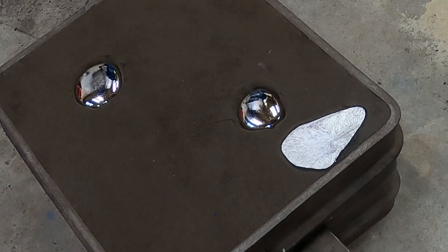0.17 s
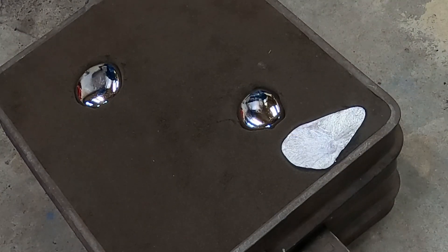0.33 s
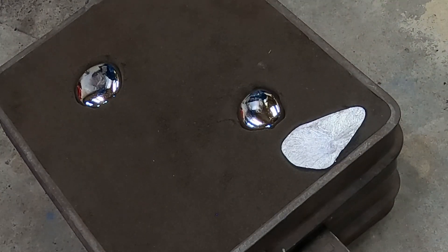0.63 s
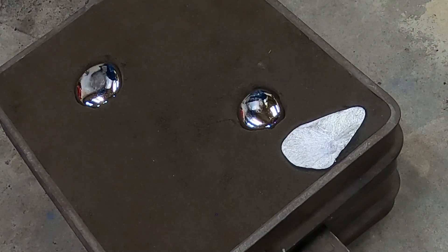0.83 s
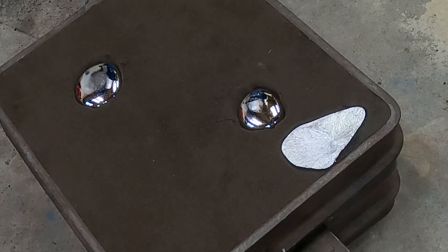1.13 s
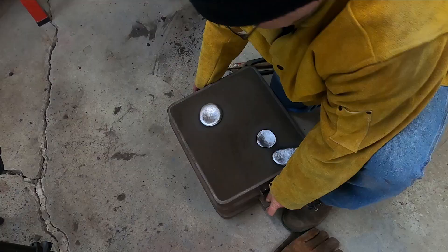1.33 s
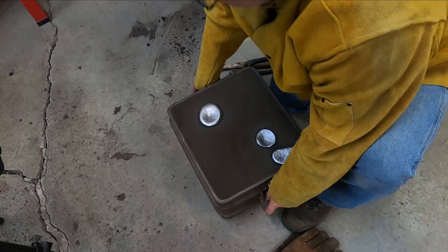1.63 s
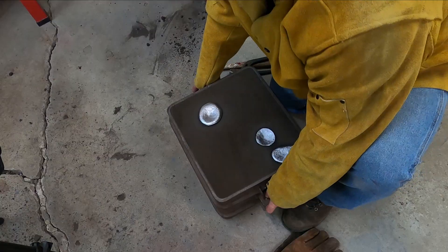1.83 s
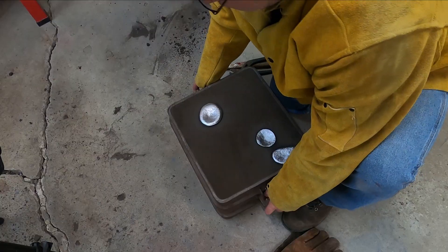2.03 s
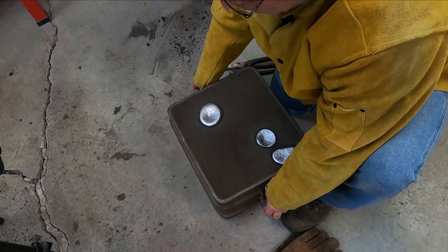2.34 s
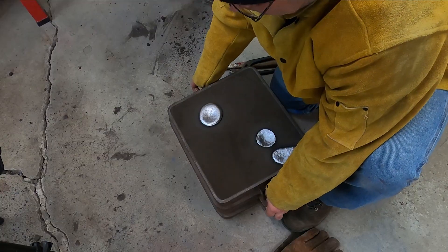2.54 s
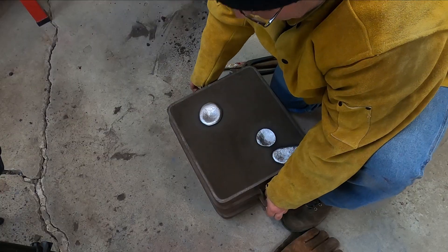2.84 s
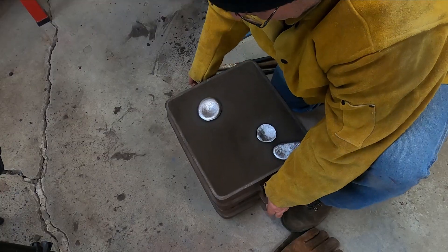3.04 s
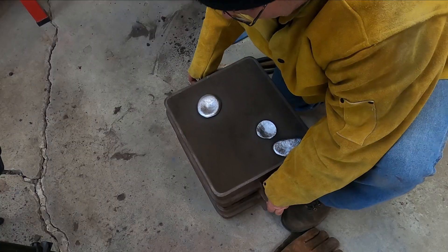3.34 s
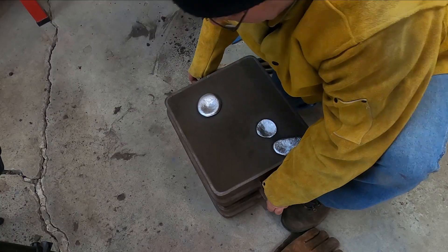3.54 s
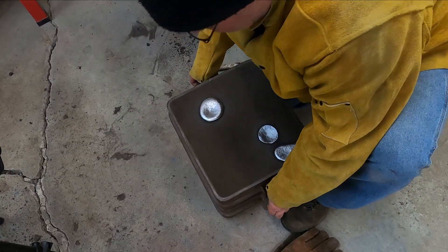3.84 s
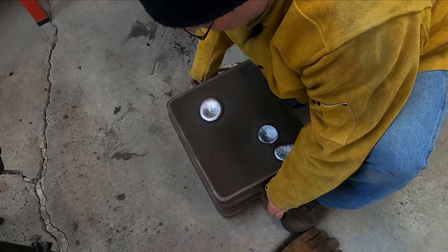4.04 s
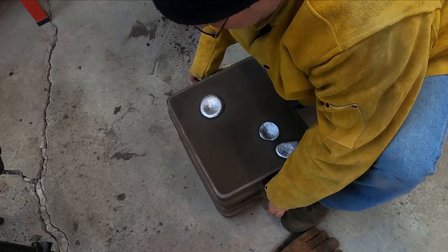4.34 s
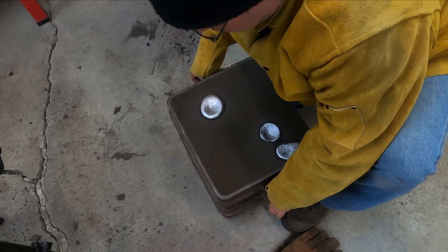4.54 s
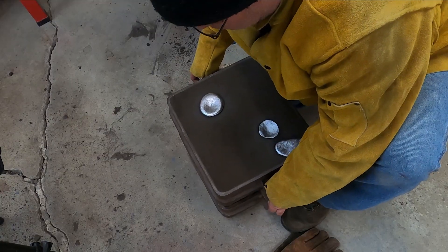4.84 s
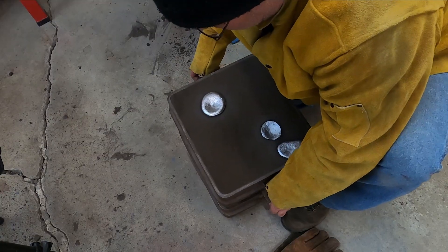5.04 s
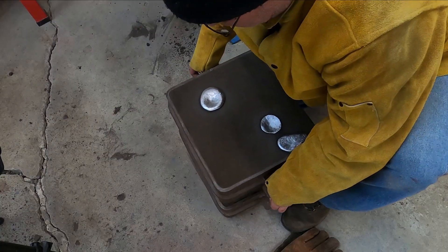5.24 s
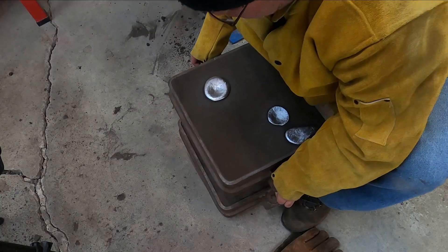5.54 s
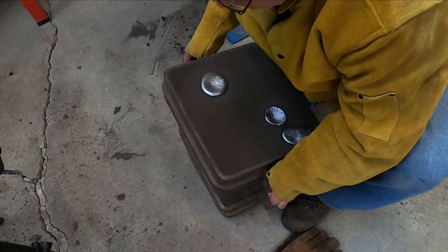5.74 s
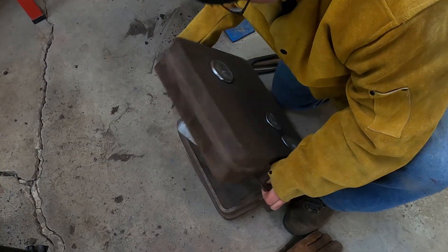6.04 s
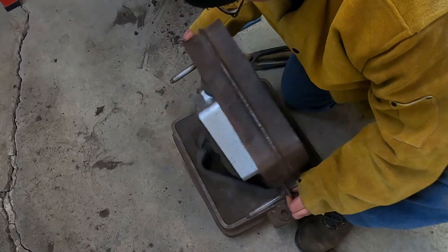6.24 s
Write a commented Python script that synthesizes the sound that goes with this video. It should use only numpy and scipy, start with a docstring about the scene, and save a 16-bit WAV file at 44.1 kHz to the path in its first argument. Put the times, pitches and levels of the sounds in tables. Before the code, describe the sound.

A quiet workshop with faint steady air and low rumble, heard close, with a short boomy room. From 0 to 0.7 s a canvas sleeve rustles softly, with sand grit, tiny ticks and a light hollow metallic touch; a sharp click and thin metal rasp come at about 0.76 s. Grit scrapes at 1.4 s, then a loud, heavy iron clunk lands at 1.47 s, deep and clattering. Softer knocks follow near 1.9 to 2.0 s, then near quiet. A firm double thud at 3.2 s begins irregular dull bumps at 3.6 to 3.9 and 4.35 s, with short sand crunches. From 4.6 to 5.1 s the knocks cluster with clicks and small rasps, the last one harder and clackier. Faint bumps at 5.35 s, then a lull with slight rustling. At 6.3 s the top half slams against the lower: the sharpest bang, bright edge, deep boom and brief rim ring.

```python
"""In a workshop, a heavy iron casting flask full of sand is rocked and pulled apart on the concrete floor.
Over steady air and a low rumble (shaped noise), a canvas sleeve rustles and loose grains tick.
Sand crunches and metal rasps (grainy noise); iron thuds and clacks (ringing modes and cracks of noise).
At last the top half is tipped over and bangs against the lower one, and its rim rings."""
import sys
import numpy as np
from scipy import signal
from scipy.fft import rfft, irfft, next_fast_len
from scipy.io import wavfile

SR = 44100
rng = np.random.default_rng(int(sys.argv[2]) if len(sys.argv) > 2 else 0)


def dump(signal):
    """Clip the signal to [-1, 1] and save it as 16-bit WAV at the path in sys.argv[1]."""
    limited = np.clip(np.atleast_2d(signal).T, -1, 1)
    pcm = np.round(limited * 32767).astype(np.int16)
    wavfile.write(sys.argv[1], SR, pcm)


N = 281799   # length of the scene in samples

# Levels in the spectra and mode tables are relative: they set the balance within one sound.
# workshop air: (frequency [Hz], level per Hz [dB])
AIR_SPECTRUM = [(28, -10.5), (45, -11), (72, -14), (100, -7.5), (180, -4.5), (300, -20.5), (700, -24.5),
                (1250, -19), (1700, -23), (2400, -32), (4500, -36.5), (6800, -35), (10000, -50),
                (14000, -65)]
AIR_DB = -66
# low rumble, faint at rest and stronger with the arm movements: (frequency [Hz], level per Hz [dB])
RUMBLE_SPECTRUM = [(25, -19.5), (50, -10), (75, 9), (105, -13.5), (170, -5), (300, -16), (700, -28.5),
                   (3000, -59.5)]
RUMBLE_REST_DB, RUMBLE_OVER_MOVEMENT_DB = -64.5, 0
# how alike left and right are: (frequency [Hz], likeness [0 to 1])
EAR_LIKENESS = [(48, .995), (80, .85), (145, .993), (330, .97), (600, .83), (1500, .74), (3000, .72),
                (8000, .6)]
ROOM_T60_S = 0.45   # time the room takes to fade by 60 dB
LEFT_LAG_S = 3.6e-5   # the left ear hears the near sounds this much later

# arm movements: (middle [s], length [s], level [dB])
ARM_MOVEMENTS = [(0.017, 0.18, -58.5), (0.26, 0.15, -63), (0.595, 0.22, -58.5), (3.785, 0.38, -66.5),
                 (4.0, .1, -69), (4.88, .3, -63), (5.536, 0.32, -65.5), (6.036, 0.075, -74),
                 (6.286, 0.18, -64.5)]
# rubbing canvas: (frequency [Hz], level per Hz [dB])
CANVAS_SPECTRUM = [(150, -5.5), (400, -4), (700, -10), (1400, -1.5), (2600, -4.5), (4300, -5), (6200, -7),
                   (8500, -15.5), (13000, -22)]
SLEEVE_TILT_DB = 6   # the dull part is raised and the bright part lowered by this much

# sand and grit: (frequency [Hz], level per Hz [dB])
GRIT_SPECTRUM = [(150, -4), (400, -4), (1500, -2.5), (2500, -6), (4200, -6.5), (5200, -9.5), (8500, -12.5),
                 (10500, -26), (14000, -31.5)]
# loose grains: rate, level setting against the movement, middle pitch
GRAINS_PER_S, GRAIN_DB, GRAIN_HZ = 4, -5, 4000
# sharp contacts of grit and of metal edges: (time [s], level [dB], pitch [Hz])
SHARP_CONTACTS = [(0.429, -49.5, 1590), (0.483, -47.5, 2140), (0.6355, -44.5, 900), (0.7568, -34.5, 3130),
                  (1.246, -54, 4590), (1.405, -47.5, 3520), (1.435, -46, 3500), (3.224, -46.5, 3300),
                  (4.598, -55, 4500), (4.749, -42.5, 2700), (4.9133, -41.5, 3130), (4.9988, -49, 5300),
                  (5.453, -56, 2300), (6.321, -14, 910), (6.3225, -45, 7500), (6.3233, -13.5, 2800)]
# sand and grit crushed under the iron: (start [s], length [s], level [dB], brightness [dB per octave])
SAND_CRUNCHES = [(0.0, 0.031, -49.5, -1.5), (0.757, 0.029, -45, -0.5), (0.804, 0.05, -48, -1.5),
                 (1.228, 0.043, -62.5, 5), (1.391, 0.15, -48.5, -3), (1.847, 0.037, -46, -2),
                 (1.973, 0.089, -59, 0), (3.222, 0.093, -52.5, -3.5), (3.665, 0.034, -58.5, -2),
                 (3.931, 0.034, -54.5, -2.5), (4.341, 0.084, -54, -3.5)]
# metal rasping on metal: (start [s], length [s], level [dB], brightness [dB per octave])
METAL_RASPS = [(0.760, 0.046, -46.5, 8), (4.747, .019, -60, 22), (4.83, 0.095, -59.5, -5),
               (4.914, .07, -55, -5)]
# colour of the rasping: (frequency [Hz], level per Hz [dB])
RASP_SPECTRUM = [(500, -9), (2000, -15), (2900, 7.5), (3600, 4.5), (4400, 1), (5100, -18), (7500, -41),
                 (8500, -13.5), (10000, -34), (14000, -38)]

# touches that make a light hollow ring: (time [s], level [dB])
HOLLOW_TOUCH_TIMES = [(0.635, -60), (0.653, -51.5), (0.676, -43.5), (0.838, -49)]
# tones of the hollow ring: (frequency [Hz], level [dB])
HOLLOW_TONES = [(392, 5), (662, -34), (688, -9), (780, -11), (980, -6.5), (1217, -14)]
# the top half's rim hits the lower half: (time [s], level [dB])
RIM_HITS = [(6.3215, -28)]
# tones of the freed top half: (frequency [Hz], level [dB])
RIM_TONES = [(945, 0), (1176, 3), (1404, -4), (1992, -8), (2414, 0), (2789, -5), (2952, -5), (3210, -6),
             (3856, -8), (4067, -8)]

# flask blows: (time [s], thud level [dB], clatter level [dB], contact hardness as a treble limit [Hz])
FLASK_BLOWS = [(0.224, -52, -60.5, 1500), (1.392, -51, -83, 800), (1.473, -14, -18.5, 3590),
               (1.885, -39, -61, 800), (1.974, -32, -43.5, 1620), (3.233, -30.5, -55, 400),
               (3.2533, -21.5, -35, 2000), (3.592, -51, -78.5, 490), (3.665, -41, -75, 420),
               (3.855, -39.5, -59, 500), (3.8995, -31.5, -45, 850), (3.935, -42.5, -44.5, 656),
               (4.352, -26.5, -44.5, 730), (4.587, -41, -58, 502), (4.737, -23.5, -40, 1150),
               (4.83, -30, -59, 500), (4.867, -26, -44, 1200), (5.033, -27, -41.5, 1050),
               (5.0768, -20.5, -24, 2300), (5.344, -41, -56, 690), (5.391, -43, -64, 600),
               (6.3092, -28, -28, 1430), (6.3206, -12.5, -23.5, 7000)]
# deep resonances of flask, floor and room: (frequency [Hz], level [dB])
THUD_TONES = [(81, -13), (107, -13.5), (146.5, 0.5), (168, -6.5), (210, -6), (266, -16.5), (292, -14),
              (336, -22), (383.5, -13.5), (424.5, -22)]
# iron frame, mostly damped by its sand: (frequency [Hz], level [dB])
IRON_TONES = [(498, -16), (576, -9.5), (613, -18), (719, -10), (903, -13), (1052, -15), (1173, -15),
              (1250, -23.5), (1420, -16), (1513, -17.5), (1626, -12), (1755, -16.5), (1894, -13.5),
              (2418, -20), (2608, -24.5), (3215, -27)]
# clatter of a blow: (frequency [Hz], level per Hz [dB])
CLATTER_SPECTRUM = [(40, -17), (120, 1.5), (350, 0), (500, -2.5), (680, -3.5), (820, -5.5), (1100, -4),
                    (1850, -10.5), (2150, -13), (3000, -18), (4200, -22.5), (4900, -30), (8000, -33),
                    (13000, -39.5)]
# first crack of a blow: (frequency [Hz], level per Hz [dB])
CRACK_SPECTRUM = [(100, -12), (400, 10.5), (700, -5), (1100, -0.5), (1850, -2), (2250, -7), (4000, -12),
                  (5000, -20.5), (12000, -35)]
# bass of a blow that lingers in the room: (frequency [Hz], level per Hz [dB])
BASS_TAIL_SPECTRUM = [(30, -15), (70, -2.5), (160, 1), (400, -14), (700, -29.5), (3000, -71.5)]
BASS_TAIL_DB, BASS_T60_S = -9, 0.7   # level against the thud setting, fading time
BOOM_HZ, BOOM_DB, BOOM_T60_S = 50, -3.5, 0.43   # lowest mode of the room
# gain of the crack against the clatter; it weakens on contacts softer than SOFT_HZ
CRACK_OVER_CLATTER_DB, SOFT_HZ, CRACK_LOSS_DB_PER_OCTAVE = 13, 1061, 7.5
# top pitch of the chattering edge, and the hardness from which it is reached
EDGE_TOP_HZ, HARD_CONTACT_HZ = 1700, 3730
# average wait for the rebound, its level against the blow, its share of the blow's hardness
REBOUND_S, REBOUND_DB, REBOUND_HARDNESS = 0.027, -9.5, 0.38

TIME = np.arange(N) / SR
AGE = TIME[:int(0.55 * SR)]   # seconds since a sound began


def from_db(db):
    """Turn decibels into a gain."""
    return 10 ** (np.asarray(db) / 20)


def at_hz(points, hz):
    """Read a table between its points, along a log-frequency axis."""
    table = np.array(points)
    return np.interp(np.log(hz + 1), np.log(table[:, 0]), table[:, 1])


def add(out, s, sound):
    """Mix a sound in at time s, cutting off what runs past the end."""
    start = max(round(s * SR), 0)
    out[:, start:start + sound.shape[-1]] += sound[..., :max(N - start, 0)]


def filtered(x, hz, kind, order):
    """Keep only some frequencies, with a Butterworth filter."""
    sos = signal.butter(order, np.clip(hz, 10, 0.45 * SR), kind, fs=SR, output="sos")
    return signal.sosfilt(sos, x)


def delayed(x, s):
    """Delay a sound, even by part of a sample, by turning the phase of each frequency."""
    padded = next_fast_len(N + SR // 10, True)
    hz = np.fft.rfftfreq(padded, 1 / SR)
    return irfft(rfft(x, padded) * np.exp(-2j * np.pi * hz * s), padded)[:N]


def noise(spectrum, size, tilt_db=0):
    """Stereo noise of rms 1, whose left and right are as alike as the likeness table says."""
    padded = next_fast_len(size, True)
    hz = np.fft.rfftfreq(padded, 1 / SR)
    mid, side = rfft(rng.standard_normal((2, padded)))
    alike = np.clip(at_hz(EAR_LIKENESS, hz), 0, 1)
    colour = from_db(at_hz(spectrum, hz) + tilt_db * np.log2(hz + 1)) * (hz > 20)
    # the side part goes to left and right with opposite signs
    stereo = np.sqrt(1 + alike) * mid + np.sqrt(1 - alike) * side * [[1], [-1]]
    x = irfft(colour * stereo, padded)[:, :size]
    return x / x.std()


def decay(t60):
    """A fade that loses 60 dB in t60 seconds."""
    return np.exp(-np.log(1000) * AGE / t60)


def struck(modes, t60, scatter_db, detune):
    """A struck body rings in many tones; strengths and pitches vary at random from blow to blow."""
    hz, db = np.transpose(modes)[:, :, None]
    strength, pitch, side = rng.standard_normal((3, len(modes), 1))
    alike = at_hz(EAR_LIKENESS, hz)
    sign = (-1) ** np.arange(len(modes))[:, None]   # neighbouring tones start in opposite directions
    gain = from_db(db + scatter_db * strength) * sign
    phase = (2 * np.pi * hz * (1 + detune * pitch) * AGE).astype(np.float32)
    mid = np.sum(gain * np.sqrt((1 + alike) / 2) * np.sin(phase), axis=0)
    # a shifted part, opposite in the two ears, puts them a little out of phase
    apart = np.sum(gain * np.sqrt((1 - alike) / 2) * np.sign(side) * np.cos(phase), axis=0)
    return (mid + apart * [[1], [-1]]) * decay(t60) * (1 - decay(0.0038))


def room_tail(hold_s):
    """Early reflections keep the level up for a moment, then the room dies away."""
    return np.minimum(decay(ROOM_T60_S) * np.exp(np.log(1000) * hold_s / ROOM_T60_S), 1)


def grainy(size, per_s, spread_db):
    """A gain of rms 1 that moves to a new random level with every grain."""
    grains = from_db(spread_db * np.clip(rng.standard_normal(size), -2, 2))
    gain = np.interp(np.arange(size) * per_s / SR, np.arange(size), grains)
    return gain / np.sqrt(np.mean(gain ** 2))


def movement():
    """How hard the arms move, as a gain: each movement swells and fades like a bell curve."""
    moving = np.zeros(N)
    for middle, length, db in ARM_MOVEMENTS:
        moving += from_db(db) * np.exp(-(2 * (TIME - middle) / length) ** 2 / 2)
    return moving


def workshop(moving):
    """Steady air, and a low rumble that grows as weight shifts with the arms."""
    rumble_gain = np.hypot(from_db(RUMBLE_REST_DB), from_db(RUMBLE_OVER_MOVEMENT_DB) * moving)
    return from_db(AIR_DB) * noise(AIR_SPECTRUM, N) + rumble_gain * noise(RUMBLE_SPECTRUM, N)


def sleeve(moving):
    """Canvas threads catch and slip as the arms move: flickering noise."""
    rub = noise(CANVAS_SPECTRUM, N) * grainy(N, per_s=1200, spread_db=2.0)
    dull = filtered(rub, 2500, "low", order=1)
    bright = rub - dull
    return moving * (dull * from_db(SLEEVE_TILT_DB) + bright * from_db(-SLEEVE_TILT_DB))


def ticks(contacts):
    """A sharp contact is a snap of a few milliseconds with a faint room tail, in a band around its pitch."""
    out = np.zeros((2, N))
    for s, db, hz in contacts:
        fade = from_db(7.5) * decay(0.018) + from_db(-9) * decay(ROOM_T60_S)
        snap = noise(GRIT_SPECTRUM, len(AGE)) * fade
        add(out, s, from_db(db) * filtered(snap, [hz / 1.6, hz * 1.21], "band", order=2))
    return out


def loose_grains(moving):
    """Stray grains tick at random moments and pitches, as loud as the movement that stirs them."""
    contacts = []
    for when, pitch in rng.random((round(GRAINS_PER_S * N / SR), 2)):
        moving_db = 20 * np.log10(moving[int(when * N)] + 1e-9)
        hz = GRAIN_HZ * 2 ** (pitch - 0.5)   # up to half an octave either way
        contacts.append((when * N / SR, GRAIN_DB + moving_db, hz))
    return ticks(contacts)


def scraping(strokes, spectrum, grains_per_s, spread_db):
    """Grains break for as long as the iron slides; the room carries them on smoothly."""
    out = np.zeros((2, N))
    for s, length, db, bright_db in strokes:
        after = np.maximum(AGE - length, 0)   # seconds since the sliding stopped
        sliding = (1 - decay(0.026)) * np.exp(-after / 0.0027)
        sliding = sliding * grainy(len(AGE), grains_per_s, spread_db)
        echo = from_db(-6.0) * (1 - decay(0.048)) * np.exp(-np.log(1000) * after / ROOM_T60_S)
        add(out, s, from_db(db) * noise(spectrum, len(AGE), bright_db) * np.hypot(sliding, echo))
    return out


def ringing(blows, modes, t60):
    """A metal body rings on after each blow."""
    out = np.zeros((2, N))
    for s, db in blows:
        add(out, s, from_db(db) * struck(modes, t60, scatter_db=5.0, detune=0.002))
    return out


def room_bass():
    """The room's lowest mode needs a few cycles to build up; a diffuse bass tail lingers."""
    boom = (1 - decay(0.16)) ** 2 * decay(BOOM_T60_S) * np.sin(2 * np.pi * BOOM_HZ * AGE)
    tail = noise(BASS_TAIL_SPECTRUM, len(AGE)) * (1 - decay(0.027)) * decay(BASS_T60_S)
    return from_db(BOOM_DB) * boom + from_db(BASS_TAIL_DB) * tail


def blow(thud_db, clatter_db, hard_hz):
    """The weight sets the deep modes thudding; the iron edge cracks and clatters, duller if soft."""
    # the deep modes vary at random in strength and pitch from blow to blow
    thud = struck(THUD_TONES, t60=0.33, scatter_db=3.5, detune=0.012) * (1 - decay(0.035))
    iron = struck(IRON_TONES, t60=0.29, scatter_db=1.5, detune=0.002)
    clatter = iron + noise(CLATTER_SPECTRUM, len(AGE)) * room_tail(hold_s=0.02)
    # the edge chatters for a few milliseconds before it sits, higher on a harder contact
    chatter = (1 - decay(0.00067)) * np.exp(-(AGE / 0.0035) ** 4)
    edge_hz = EDGE_TOP_HZ * np.sqrt(min(hard_hz / HARD_CONTACT_HZ, 1))
    edge = np.sin(2 * np.pi * edge_hz * AGE)
    crack = chatter * (from_db(-7.0) * noise(CRACK_SPECTRUM, len(AGE)) + from_db(-5.5) * edge)
    octaves_too_soft = max(np.log2(SOFT_HZ / hard_hz), 0)
    crack_db = CRACK_OVER_CLATTER_DB - CRACK_LOSS_DB_PER_OCTAVE * octaves_too_soft
    contact = filtered(clatter + from_db(crack_db) * crack, hard_hz, "low", order=3)
    return from_db(thud_db) * thud + from_db(clatter_db) * contact


def flask():
    """Each blow booms in the room; then the flask rocks back once, lighter and duller."""
    out = np.zeros((2, N))
    for s, thud_db, clatter_db, hard_hz in FLASK_BLOWS:
        add(out, s, blow(thud_db, clatter_db, hard_hz) + from_db(thud_db) * room_bass())
        rebound = blow(thud_db, clatter_db, hard_hz * REBOUND_HARDNESS)
        add(out, s + REBOUND_S * rng.uniform(0.8, 1.2), from_db(REBOUND_DB) * rebound)
    return out


def scene():
    """All but the air and rumble reach the left ear slightly late, so they sit a little to the right."""
    moving = movement()
    background = workshop(moving)
    cloth_and_grains = sleeve(moving) + loose_grains(moving) + ticks(SHARP_CONTACTS)
    sand = scraping(SAND_CRUNCHES, GRIT_SPECTRUM, grains_per_s=1400, spread_db=3.0)
    rasps = scraping(METAL_RASPS, RASP_SPECTRUM, grains_per_s=560, spread_db=-1.5)
    hollow = ringing(HOLLOW_TOUCH_TIMES, HOLLOW_TONES, t60=0.16)
    rim = ringing(RIM_HITS, RIM_TONES, t60=0.2)
    near = cloth_and_grains + sand + rasps + hollow + rim + flask()
    return np.array([delayed(near[0], LEFT_LAG_S), near[1]]) + background


def record(dry):
    """The microphone sheds the lowest bass, the highest peaks are rounded and the top is cut."""
    rounded = np.tanh(filtered(dry, 21, "high", order=2))
    top_cut = signal.cheby2(12, 60, 13800, fs=SR, output="sos")   # 60 dB down from 13800 Hz
    return signal.sosfilt(top_cut, rounded)


dry = scene()
out = record(dry)
dump(out)
```